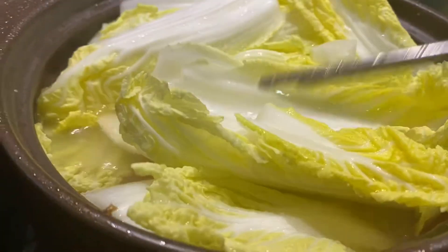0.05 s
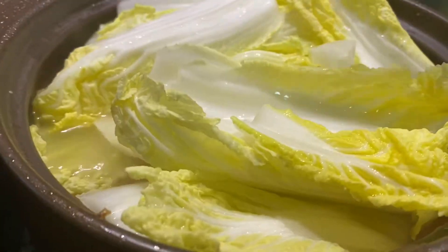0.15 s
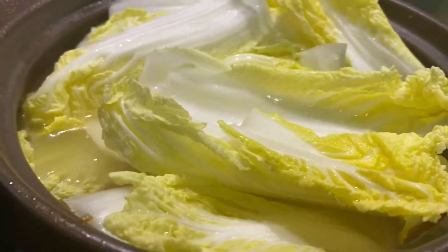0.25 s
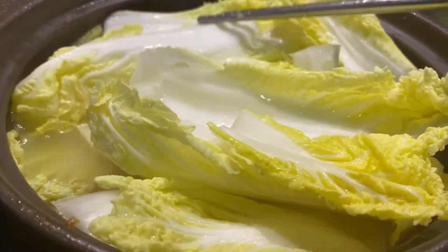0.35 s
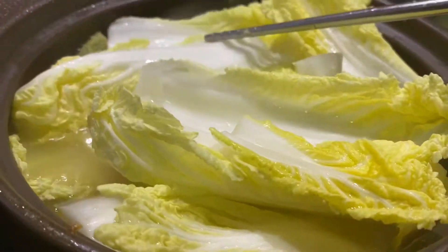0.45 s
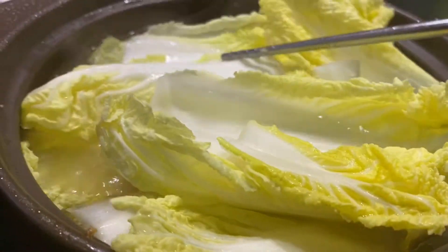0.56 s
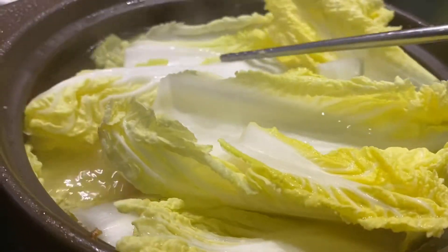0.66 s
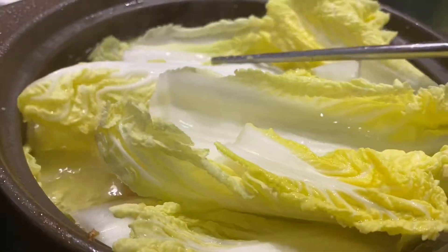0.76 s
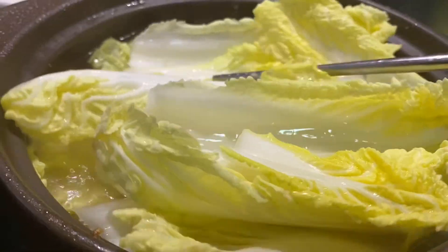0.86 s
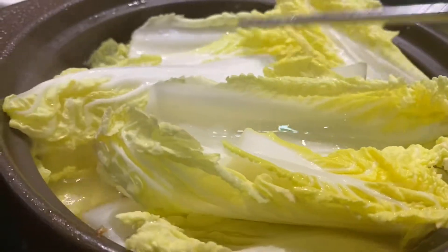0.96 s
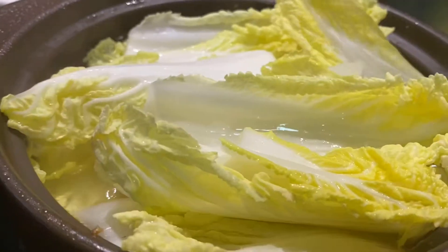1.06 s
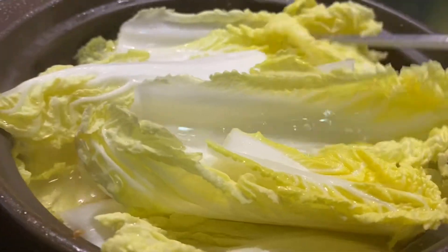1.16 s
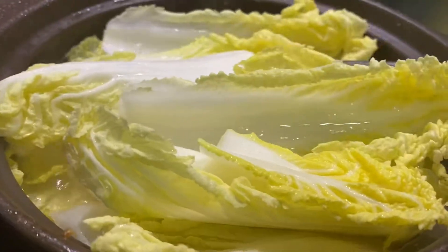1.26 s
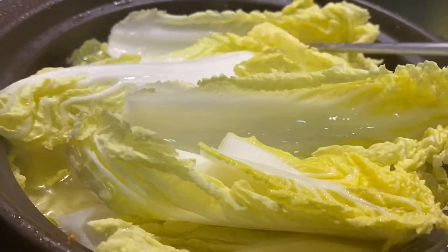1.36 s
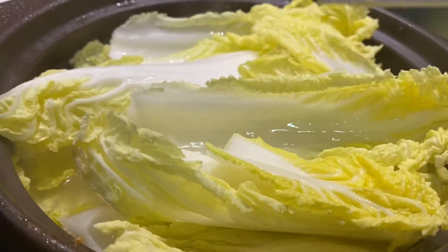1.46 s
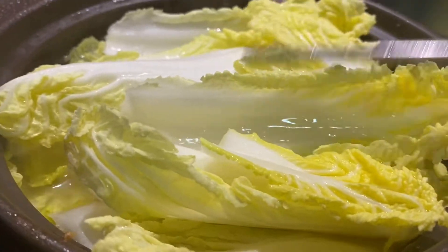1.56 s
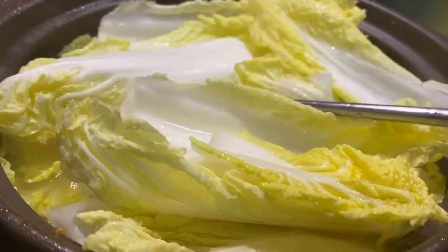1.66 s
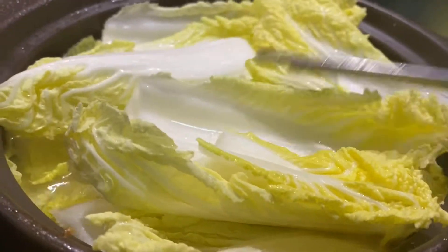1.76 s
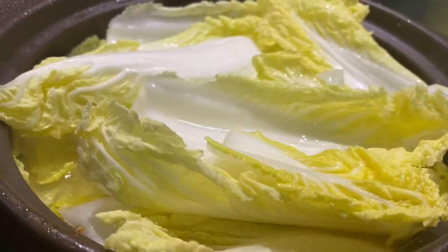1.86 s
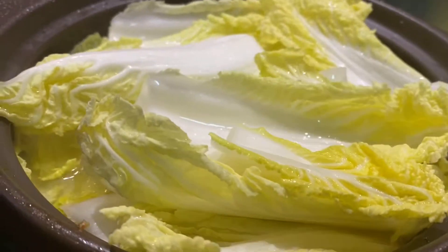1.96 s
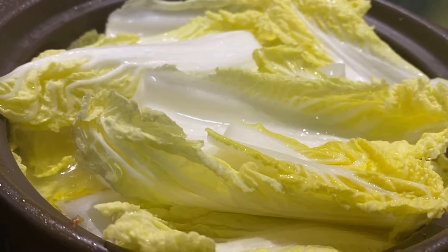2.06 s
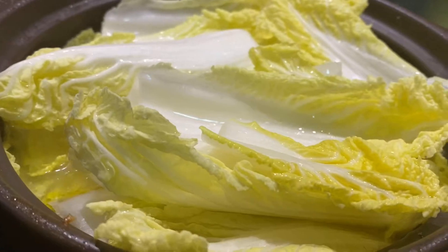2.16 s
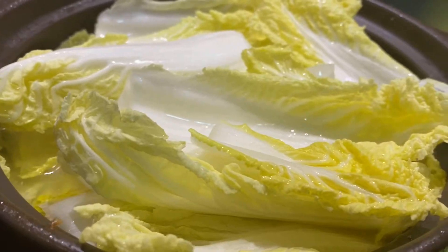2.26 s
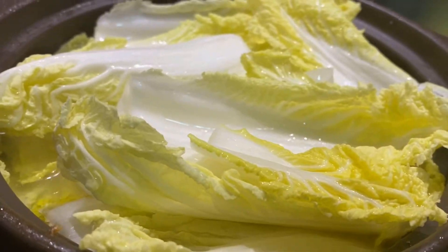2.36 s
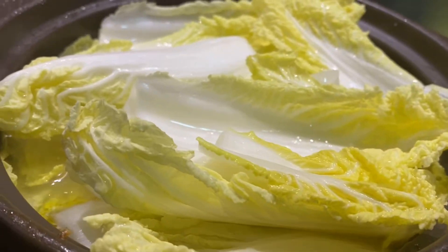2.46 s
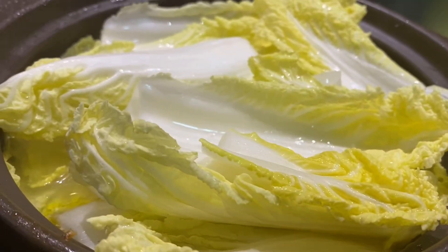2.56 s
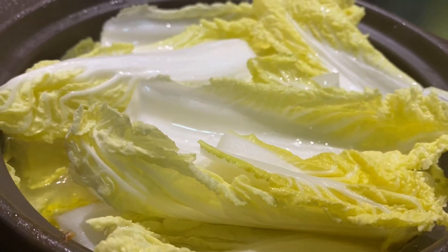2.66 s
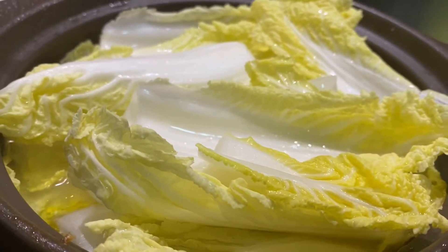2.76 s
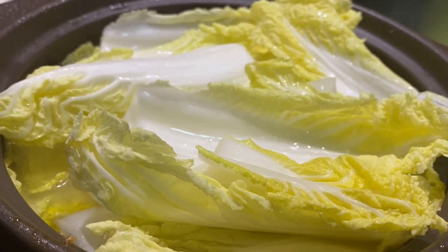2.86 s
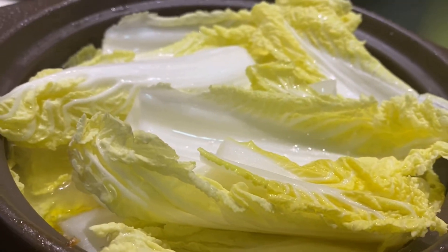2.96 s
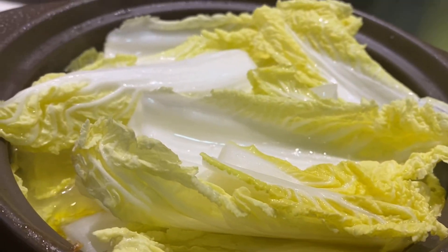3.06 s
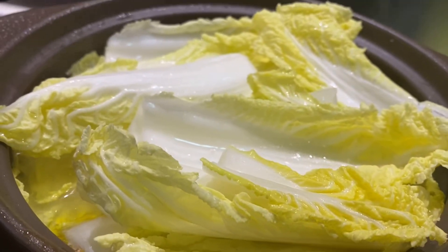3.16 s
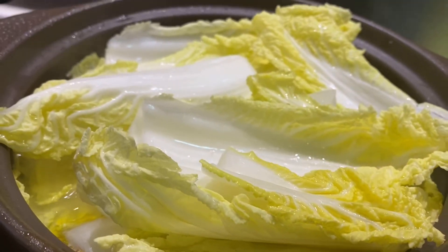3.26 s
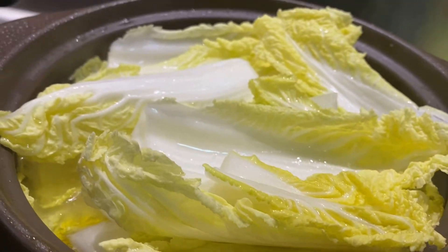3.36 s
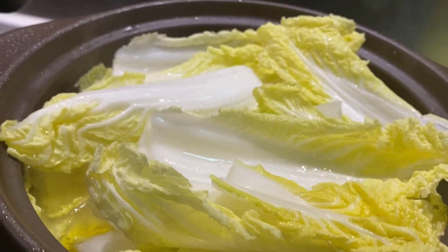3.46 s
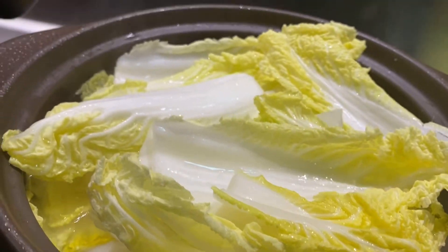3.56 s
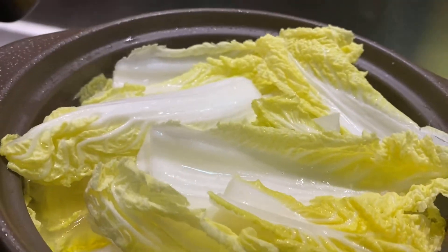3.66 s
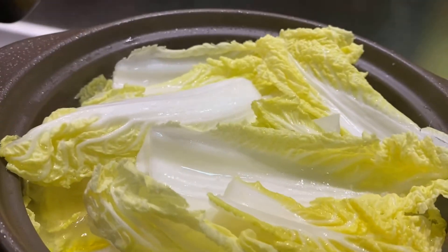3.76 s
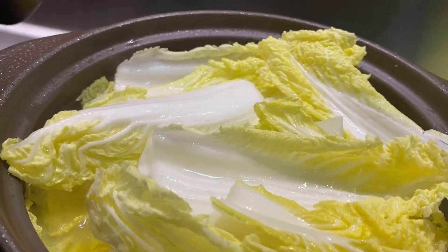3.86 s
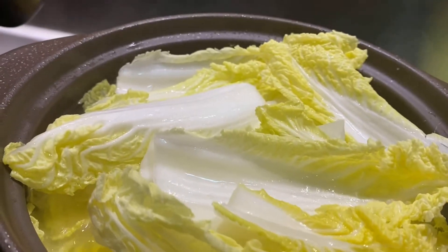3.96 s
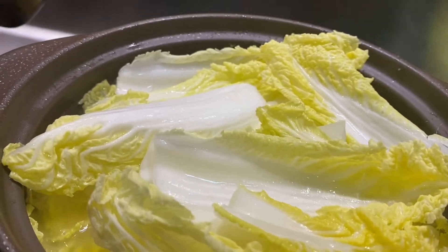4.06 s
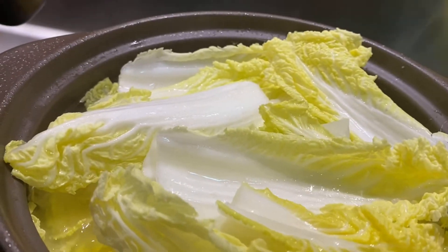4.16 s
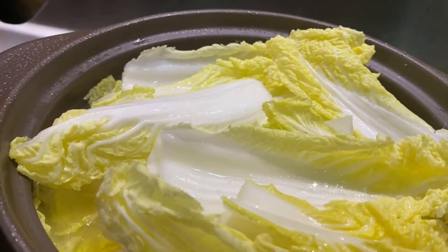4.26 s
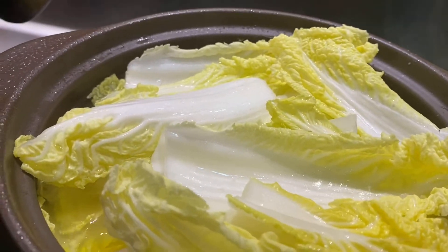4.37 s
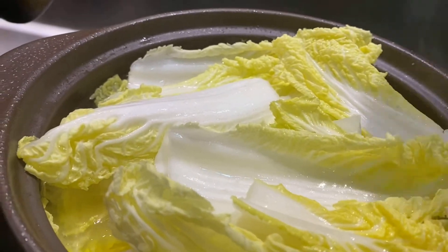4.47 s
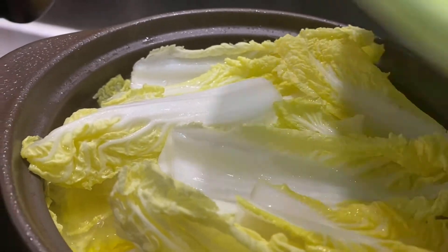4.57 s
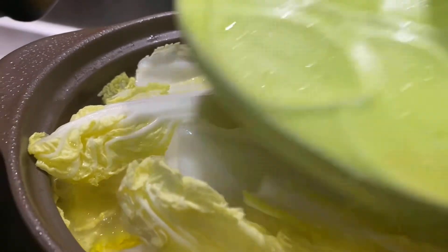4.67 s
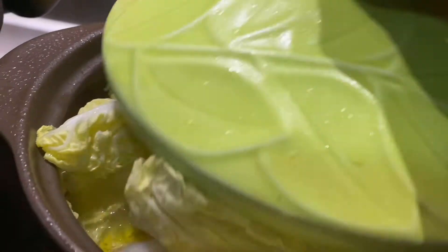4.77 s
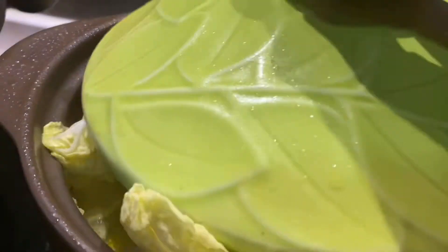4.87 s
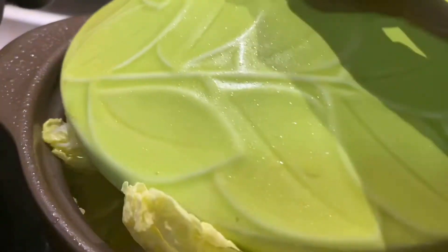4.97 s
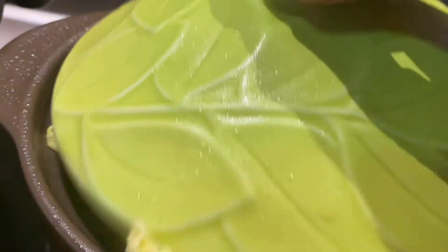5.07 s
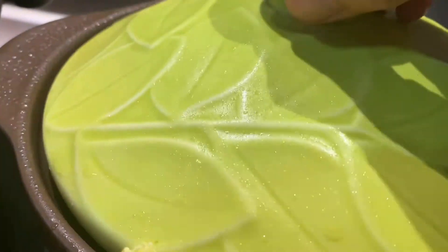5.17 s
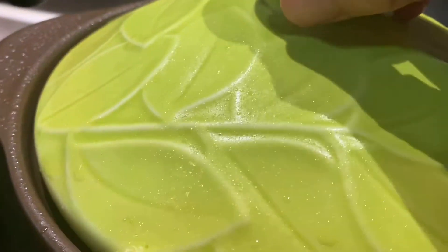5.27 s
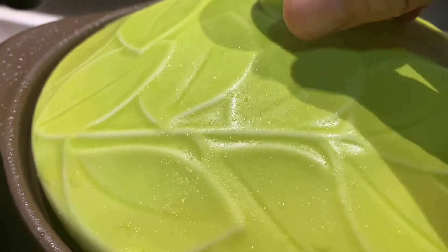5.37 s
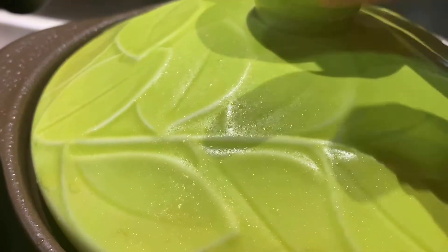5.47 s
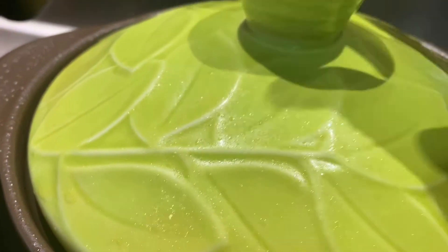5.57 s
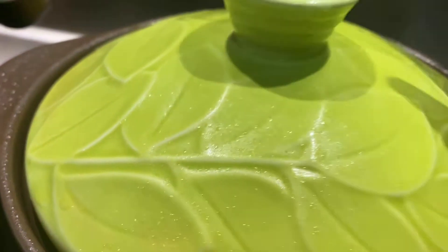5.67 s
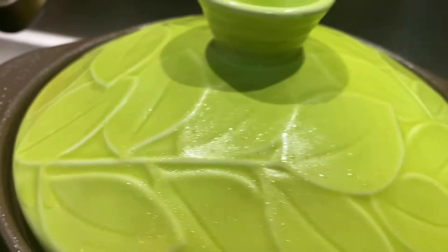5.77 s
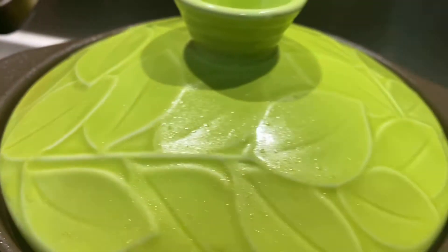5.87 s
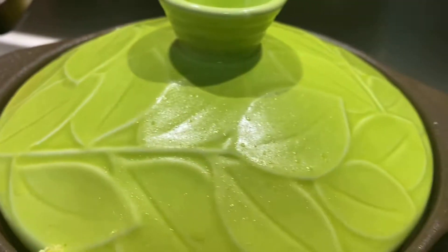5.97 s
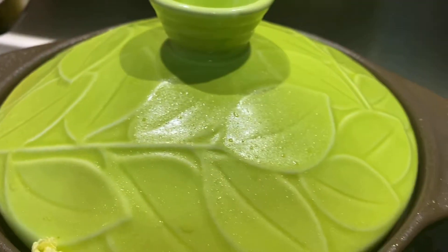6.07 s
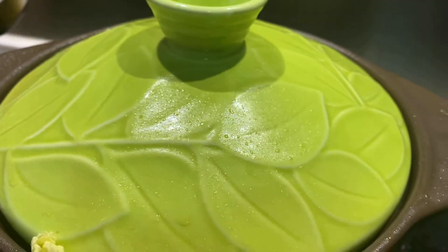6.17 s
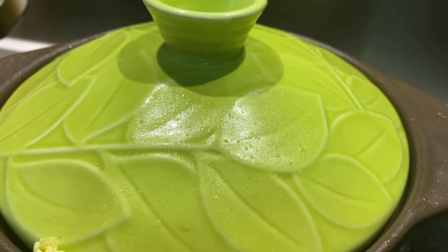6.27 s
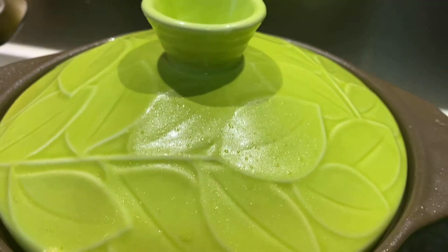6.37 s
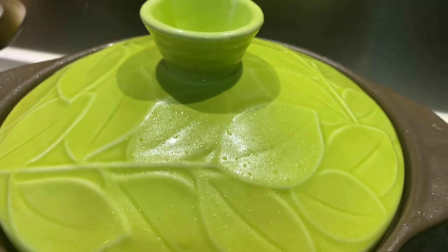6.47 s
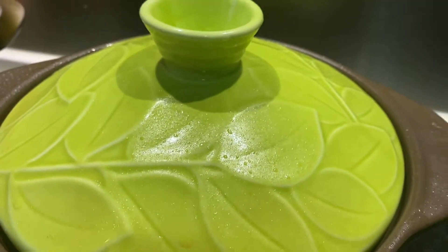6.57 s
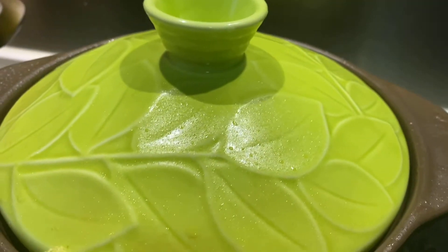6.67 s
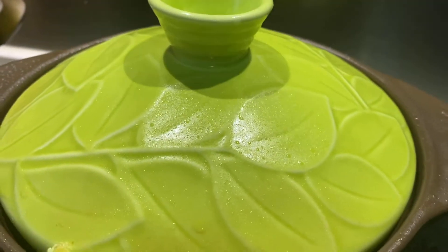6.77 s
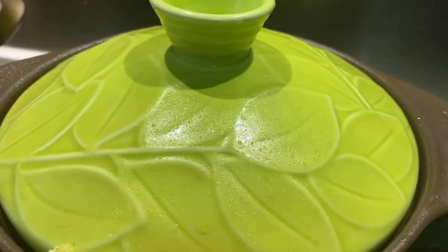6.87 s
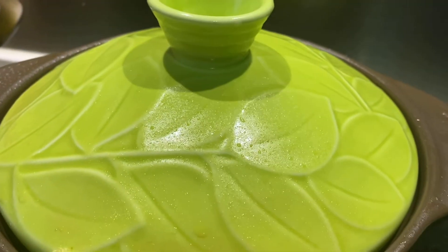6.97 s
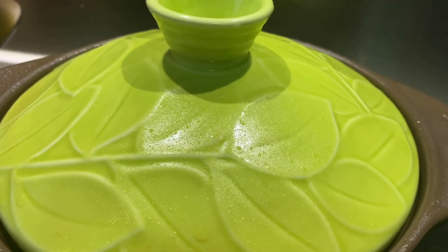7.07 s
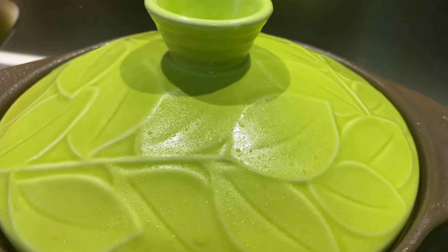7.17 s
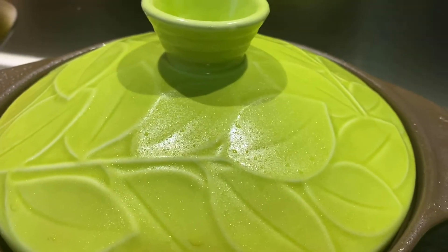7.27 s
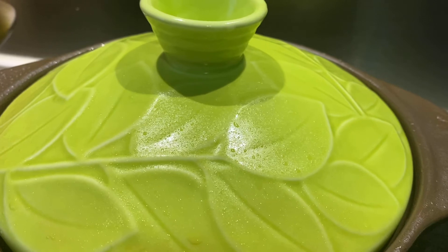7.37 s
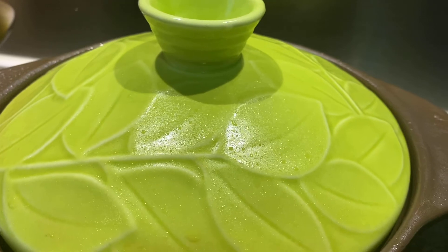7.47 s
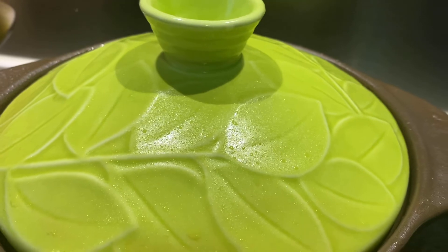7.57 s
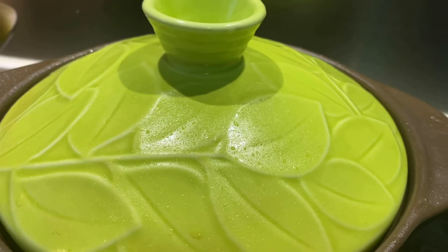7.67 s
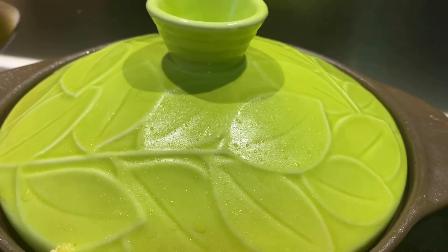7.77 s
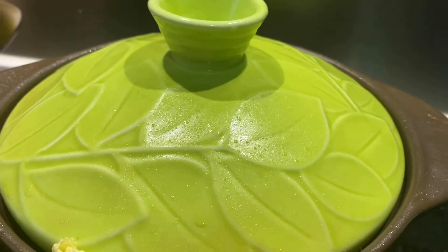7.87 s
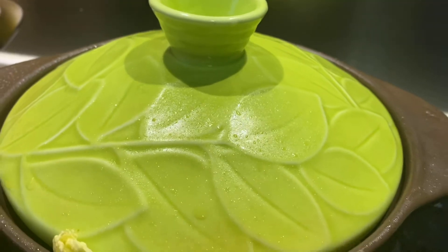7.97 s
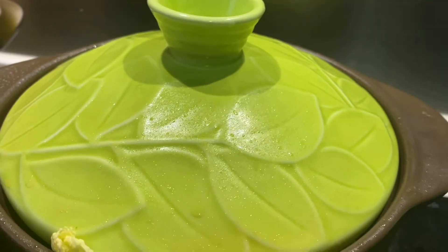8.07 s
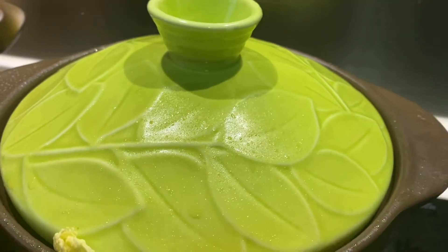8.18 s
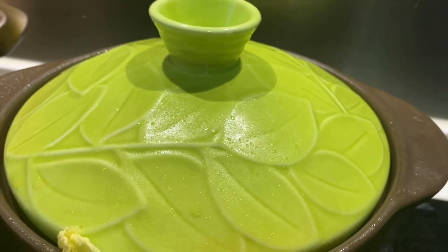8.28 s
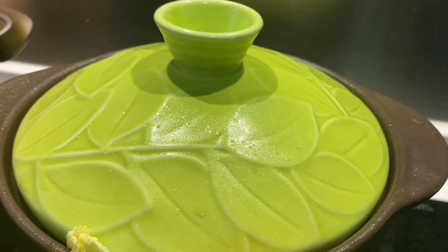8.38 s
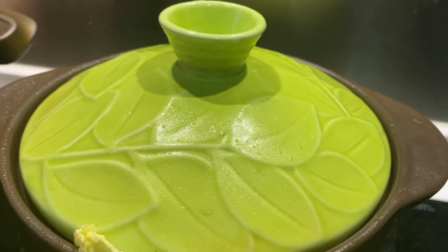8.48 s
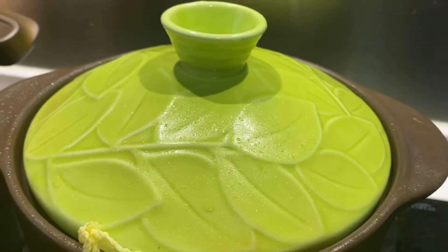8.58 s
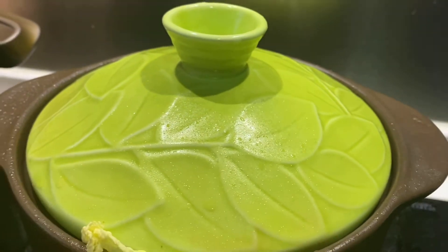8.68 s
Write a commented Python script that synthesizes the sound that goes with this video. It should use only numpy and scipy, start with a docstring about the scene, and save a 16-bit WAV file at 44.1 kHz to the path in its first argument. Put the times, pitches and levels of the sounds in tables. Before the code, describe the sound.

A steady kitchen fan hum, faint leafy ticks, a quick metallic chopstick rattle on a dish, then a ceramic lid clacking onto a clay pot.

```python
"""Kitchen: an extractor fan hums over a clay pot of cabbage (shaped noise plus a steady buzz).
Leaves tick under steel chopsticks (noise puffs, short rings), which drop on a dish and rattle (modes, noise bursts).
A glazed lid knocks the rim twice, scrapes along it and drops into its seat (modes struck, then fed with noise).
The hum dips after loud blows; it sinks at a hard lid knock, stays low, then climbs part of the way back."""
import sys
import numpy as np
from scipy import signal
from scipy.fft import rfft, irfft, next_fast_len
from scipy.io import wavfile
from scipy.ndimage import uniform_filter1d

SR = 44100
rng = np.random.default_rng(int(sys.argv[2]) if len(sys.argv) > 2 else 0)


def unload_audio(sound):
    """Save the sound as a 16-bit wav file, at the path given as the first command line argument."""
    columns = np.transpose(np.atleast_2d(sound))
    # keep every value between -1 and 1, then stretch to whole-number steps
    steps = np.round(np.clip(columns, -1, 1) * 32767)
    wavfile.write(sys.argv[1], SR, steps.astype(np.int16))


N = 384993


def amp(db):
    """dB to gain."""
    return 10 ** (np.asarray(db) / 20)


def evened(x):
    """Scales to rms 1."""
    return x / np.sqrt(np.mean(x ** 2) + 1e-20)


def read(points, hz):
    """Reads a table on a log-frequency axis."""
    f, value = np.transpose(points)
    return np.interp(np.log(hz + 1), np.log(f + 1), value)


def add(mix, start_s, sound, pan_db):
    """Places a sound at start_s; pan_db is left minus right."""
    part = mix[:, round(start_s * SR):][:, :sound.shape[-1]]
    side_db = np.array([[.5], [-.5]]) * pan_db
    part += amp(side_db) * sound[..., :part.shape[1]]


def burst(centre_hz, t60_s, spread_oct):
    """Decaying noise puff, Gaussian band on a log-frequency axis; rms 0.5 before the decay."""
    t = np.arange(4096) / SR
    f = np.fft.rfftfreq(4096, 1 / SR) + 1
    band = np.exp(-.5 * (np.log2(f / centre_hz) / spread_oct) ** 2)
    puff = irfft(rfft(rng.standard_normal(4096)) * band)
    return evened(puff) * amp(-60 * t / t60_s) / 2


def contact_flutter(mode_count, samples):
    """Loose contact: slow complex noise per mode, rms 1, held for 32 samples a step."""
    a, b = rng.standard_normal((2, mode_count, samples // 32 + 1))
    real = uniform_filter1d(uniform_filter1d(a, 8, 1), 8, 1)
    imag = uniform_filter1d(uniform_filter1d(b, 8, 1), 8, 1)
    flutter = real + 1j * imag
    flutter /= np.sqrt(np.mean(abs(flutter) ** 2))
    return np.repeat(flutter, 32, 1)[:, :samples]


def ring(modes, bright_db_per_oct=0., first_db=0., second_db=0., free_s=1., chatter=0.69,
         choke_db_per_s=496.0, loss_db=30., wide_rad=0.75):
    """Modes start at once; loose contact flutters them, a touch after free_s takes up to loss_db away."""
    hz, db, t60_s = np.transpose(modes)[:, :, None]
    t = np.arange(SR // 3) / SR
    # small random level scatter per mode, drawn anew for each ring
    db = db + bright_db_per_oct * np.log2(hz / 4000) + 0.45 * rng.standard_normal(hz.shape)
    db[:2, 0] += first_db, second_db
    felt = np.clip(hz / 3300, 0, 1) ** 1.6  # low modes hardly feel a light touch
    choked_db = felt * np.clip(choke_db_per_s * (t - free_s), 0, loss_db)
    attack = 1 - np.exp(-t / 0.00039)
    fade = amp(db - 60 * t / t60_s - choked_db) * attack
    chatter = np.clip(chatter, 0, 1) * np.sqrt(felt)
    contact = np.sqrt(1 - chatter ** 2) + chatter * contact_flutter(len(hz), len(t))
    wave = fade * contact * np.exp(2j * np.pi * hz * t)
    lead = wide_rad * rng.standard_normal(hz.shape)  # left-right phase, drawn per mode
    left = (wave * np.exp(.5j * lead)).sum(0).imag
    right = (wave * np.exp(-.5j * lead)).sum(0).imag
    return np.array([left, right])


def chatter_of(base, first_db):
    """A clean blow rings the first mode strongly and flutters little."""
    return base - .05 * first_db


def chopsticks():
    """Steel rods bounce: each landing cracks, thuds, rings rod and dish; the next one chokes the rod."""
    # landings: start_s, strength_db, bright_db_per_oct, first_mode_db, second_mode_db, crack_db, dish_db
    landings = [(2.2783, -18, 5, -4.5, 1, 5, -16), (2.3005, -16, 0.5, 5.5, 1.5, 3, -20),
                (2.327, -24, 2.5, 11, 2, -4, -16), (2.358, -31.5, 6, -15, 6, 3, -14),
                (2.377, -11.5, 0, -9.5, 2, -1.5, -12), (2.389, -18, 1, -13.5, -2, -12, -5.5),
                (2.402, -14.5, 0.5, -2, -4, -11, -11), (2.412, -19, 0, -3.5, -4, -5, -11),
                (2.437, -28, 2, -9, -7, 0, -10), (2.457, -32.5, -1, -19, 5, 0, -9)]
    # steel rod modes: hz, level_db, t60_s
    rod_modes = [(3327, -1, .45), (5658, -1, .15), (3505, -19, .12), (6010, -20, .2), (6385, -20, .2),
                 (7625, -14, .2), (7795, -11, .17), (8258, -5, .16), (8530, -6, .13), (10500, -16, .12),
                 (11250, -14, .15), (11795, -11, .14), (13700, -12, .1), (14425, -13, .16),
                 (15500, -24, .12)]
    # dish modes: hz, level_db, t60_s
    dish_modes = [(5268, 1, 0.27), (5184, -6, .2), (1560, -10, .08), (1640, -2, 0.11), (1743, -4, .09),
                  (4404, -28, .15)]
    thud_db, pan_db, grip_after_s = -4, 3, 0.0018
    out = np.zeros((2, N))
    gaps_s = np.diff([row[0] for row in landings], append=N / SR)
    for (s, db, bright, first_db, second_db, crack_db, dish_db), gap_s in zip(landings, gaps_s):
        rod = ring(rod_modes, bright, first_db, second_db, gap_s + grip_after_s,
                   chatter_of(.35, first_db), choke_db_per_s=1200., loss_db=20.0)
        dish = ring(dish_modes, chatter=0.38)
        add(out, s, amp(db) * rod + amp(db + dish_db) * dish, pan_db)
        add(out, s, amp(db + crack_db) * burst(3400, 0.056, 1.3), pan_db)
        add(out, s, amp(db + crack_db + thud_db) * burst(274, 0.077, 0.77), pan_db)
    return out


def lid():
    """Knocks ring lid and pot; the slide feeds grit into their modes; closing squeezes out air."""
    # knocks: start_s, strength_db, bright_db_per_oct, first_mode_db, second_mode_db, free_s, thud_db
    knocks = [(4.0165, -25, -5.5, 0.1, -3, 0.0051, -2), (4.75, -28, -5, -6, -13, 0.007, -4),
              (4.7568, -15, 0, 6, 2, 0.031, 2.5), (4.792, -32, 1, -8, -11, 0.02, -9),
              (4.8947, -20, 0.5, -7.5, 3, 0.042, -8), (5.1352, -13, 4.5, -6, -1, 0.021, 3),
              (5.142, -18, 5, 0.5, -2, 0.015, 4), (5.152, -21.5, 2, -6, -2, 0.016, 9),
              (5.165, -33, -1, -9, -6, .02, -3), (5.199, -43, -1, -5, -10, 0.055, -6)]
    # slide on the rim: time_s, grit_db
    slide = [(5.02, -50), (5.05, -38), (5.08, -30), (5.105, -37), (5.125, -31.5), (5.15, -28), (5.21, -52),
             (5.261, -60)]
    # glazed lid modes: hz, level_db, t60_s
    lid_modes = [(3631, 0, .3), (1930, -14, .7), (2234, -24, .2), (3580, -14, .17), (3860, -5, .045),
                 (4900, -16, .04), (5722, -16, .28), (6585, -20, .2), (6627, -14, .17), (7240, -24, .15),
                 (8080, -12, .1), (9860, -28, .12), (10690, -17, .1), (11850, -26, .12), (12550, -30, .1),
                 (13500, -30, .15)]
    # clay pot modes: hz, level_db, t60_s
    pot_modes = [(286, -16, 0.11), (366, -13, 0.17), (562, -8.5, 0.065), (733, -9.5, 0.076),
                 (840, -6, 0.082), (1066, 5, 0.021), (1290, -9.5, 0.044), (2530, -2, 0.032)]
    crack_db, pot_db, pan_db = 4.5, -2.5, 3.5
    out = np.zeros((2, N))
    for s, db, bright, first_db, second_db, free_s, thud_db in knocks:
        glaze = ring(lid_modes, bright, first_db, second_db, free_s, chatter_of(.5, first_db),
                     choke_db_per_s=700., loss_db=17.0, wide_rad=0.49)
        add(out, s, amp(db) * glaze, pan_db)
        add(out, s, amp(db + pot_db) * ring(pot_modes, chatter=0.96, wide_rad=1.3), pan_db)
        add(out, s, amp(db + crack_db) * burst(1700, 0.05, 0.93), pan_db)
        add(out, s, amp(db + thud_db) * burst(210, 0.033, 0.68), pan_db)

    s, db = np.transpose(slide)
    t = np.arange(s[0], s[-1], 1 / SR)
    grit = rng.standard_normal(len(t)) * amp(np.interp(t, s, db))
    body = ring(lid_modes, 1.9, 2.0, -4.0, 0.053, 0.091) + amp(4) * ring(pot_modes)
    rasp, rumble = amp(19.0) * burst(610, 0.0088, 1.2), amp(12.5) * burst(120, .03, 0.55)
    body[:, :4096] += rasp + rumble
    add(out, s[0], signal.fftconvolve(grit[None], body / np.linalg.norm(body[0])), 1.5)

    push = np.arange(-.012, .012, 1 / SR) / 0.0026  # air squeezed out as the lid closes
    add(out, 5.12, amp(-11) * -push * np.exp(-push ** 2), .1)
    return out


def ticks():
    """Leaves and pot give short crisp puffs; the held chopsticks ring for a moment."""
    # ticks: start_s, level_db, centre_hz, t60_s, tips_db
    touches = [(.3915, -33, 11000, .01, -20), (0.402, -18.5, 2200, .012, -18), (.847, -20, 5000, 0.02, -9),
               (1.229, -18.5, 5500, 0.05, -5), (1.6796, -42, 5000, .02, -14)]
    # hand-held steel tip modes: hz, level_db, t60_s
    tip_modes = [(2620, -1, .025), (3980, -10, 0.019), (5950, -1.5, 0.031), (7070, 0, 0.021),
                 (10450, 0, 0.016), (13500, -5, .022)]
    pan_db = 4
    out = np.zeros((2, N))
    for s, db, centre_hz, t60_s, tips_db in touches:
        add(out, s, amp(db) * burst(centre_hz, t60_s, 1.6), pan_db)
        add(out, s, amp(db + tips_db) * ring(tip_modes, chatter=0.66), pan_db)
    return out


def fan():
    """Air roar from random short-time spectra with drifting patches, plus the motor's buzz at twice the mains."""
    # air roar, relative density: hz, level_db
    roar_db = [(25, -84), (38, -71), (50, -59), (80, -48), (112, -56.5), (190, -59), (260, -57), (320, -65),
               (500, -70), (1000, -70), (2000, -75), (4000, -82.5), (8000, -90), (15500, -102)]
    # duct and room resonances: centre_hz, width_hz, lift_db
    resonances = [(90.9, 6.9, 8), (144.6, 27, 11), (226.7, 37.7, 11.5), (386, 41, 4), (722, 127, 8),
                  (1078, 72, 8), (1303, 25, 7.5), (1720, 50, 6.5), (2366, 97, 2), (2910, 720, 2)]
    # left-right likeness, clipped to -1..1 on use: hz, likeness
    likeness = [(60, 1.9), (160, 1.16), (270, 0.84), (450, -0.07), (1200, 0.5), (2000, -0.04), (3300, 0.46),
                (5500, 0.47), (7000, -0.15), (7150, -0.5), (16000, 3)]
    # balance: hz, left_minus_right_db
    balance = [(50, 0), (80, -2.5), (130, -6), (290, 3), (640, 1.5), (1410, 0), (3100, 3.5), (6000, 5.5),
               (8000, 8.5)]
    buzz_hz, buzz_rms_db, roar_rms_db = 100.5, -31.5, -25.5  # before the hum's level changes
    frames, hz = N // 1024 + 5, np.fft.rfftfreq(4096, 1 / SR)
    a, b, c, d, patches = rng.standard_normal((frames, 2049, 5)).T
    patches_db = evened(uniform_filter1d(uniform_filter1d(patches, 28, 0), 3, 1))
    colour_db = read(roar_db, hz)
    for centre_hz, width_hz, lift_db in resonances:
        colour_db = colour_db + lift_db / (1 + (2 * (hz - centre_hz) / width_hz) ** 4)
    alike = np.clip(read(likeness, hz), -1, 1)[:, None]
    left = a + 1j * b
    right = alike * left + np.sqrt(1 - alike ** 2) * (c + 1j * d)
    side_db = np.array([.5, -.5])[:, None, None] * read(balance, hz)[:, None]
    spectra = np.array([left, right]) * amp(colour_db[:, None] + patches_db + side_db)
    noise = signal.istft(spectra, nperseg=4096, noverlap=3072)[1][:, :N]
    roar = amp(roar_rms_db) * evened(noise)
    t = np.arange(N) / SR
    buzz = amp(buzz_rms_db) * np.sqrt(2) * np.sin(2 * np.pi * buzz_hz * t)
    return (roar + buzz) * amp(hum_db(t))


def hum_db(t):
    """Hum level: sinks at the first hard lid knock, stays low, steps up and climbs; rounded dips on top."""
    # dips after loud blows: start_s, deepest_after_s, depth_db
    dips = [(2.35, 0.11, -9.5), (4.755, 0.093, -9.5), (5.13, 0.068, -4)]
    sink_s, sink_db, sink_in_s = 4.755, -9.5, .025
    step_s, step_db, step_in_s, climb_db_per_s = 7.22, 2.5, 0.21, 2
    level_db = sink_db * np.clip((t - sink_s) / sink_in_s, 0, 1)
    level_db += step_db * np.clip((t - step_s) / step_in_s, 0, 1)
    level_db += climb_db_per_s * np.maximum(t - step_s, 0)
    for start_s, deepest_after_s, depth_db in dips:
        u = np.maximum(t - start_s, 0) / deepest_after_s
        level_db += depth_db * u * np.exp(.5 * (1 - u ** 2))
    return level_db


def kitchen(x):
    """Room tail: sparse taps of random sign, one in every 20 samples, each band dying at its own speed."""
    # room decay: hz, t60_s
    decay = [(200, 0.24), (2000, 0.3), (10000, 0.25)]
    size = SR // 2
    taps = np.zeros((2, size))
    at = np.arange(60, size - 20, 20) + rng.integers(0, 20, (2, (size - 61) // 20))
    np.put_along_axis(taps, at, rng.choice([-1., 1.], at.shape), 1)
    hz, t, z = signal.stft(taps, SR, nperseg=256)
    fade = amp(-60 * t / read(decay, hz)[:, None])
    tail = signal.istft(z * fade, SR, nperseg=256)[1]
    return signal.fftconvolve(x.mean(0)[None], tail / np.linalg.norm(tail[0]), axes=1)[:, :N]


def scene():
    """Blows with their room over the fan."""
    blows = chopsticks() + lid() + ticks()
    return blows + amp(-9.5) * kitchen(blows) + fan()


def record(dry):
    """Treble mostly shared, channels turning in and out of phase with pitch; rounded peaks; band limit."""
    turn_from_hz, turn_every_hz, edge_hz, ceiling = 7020, 3990, 16000, .92
    size = next_fast_len(N + 4096)
    hz = np.fft.rfftfreq(size, 1 / SR)
    sides = rfft(dry, size)
    shared = np.clip((hz - 6300) / 1200, 0, .85)
    sides += shared * (sides.mean(0) - sides)
    turn = 2 * np.pi * np.maximum(hz - turn_from_hz, 0) / turn_every_hz
    turn -= 0.37 * np.sin(2 * turn)  # lingers at same and at opposite phase
    turned = irfft(sides * np.exp(.5j * np.array([[-1], [1]]) * turn), size)[:, :N]
    rounded = turned / (1 + (turned / ceiling) ** 6) ** (1 / 6)
    lowpass = signal.firwin(255, edge_hz, window=("kaiser", 9), fs=SR)
    return signal.oaconvolve(rounded, lowpass[None], "same")


dry = scene()
out = record(dry)
unload_audio(out)
```